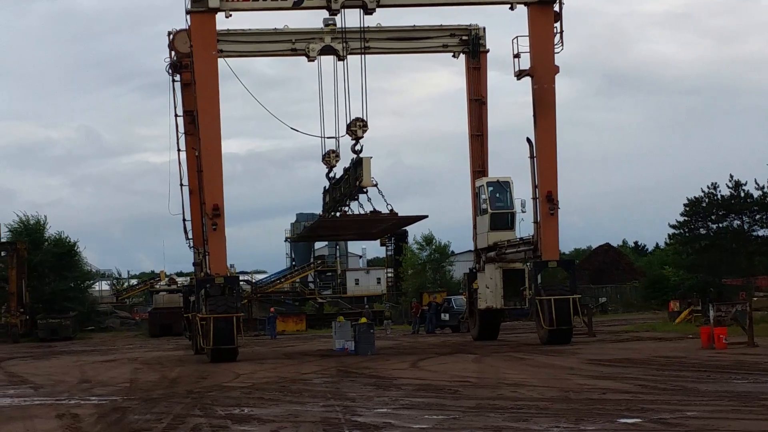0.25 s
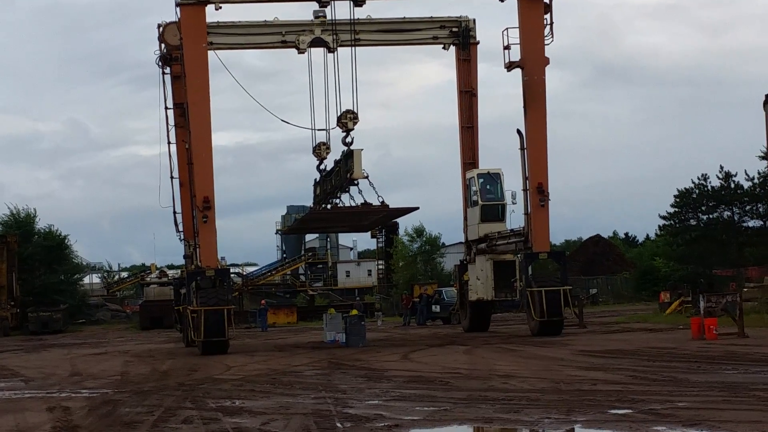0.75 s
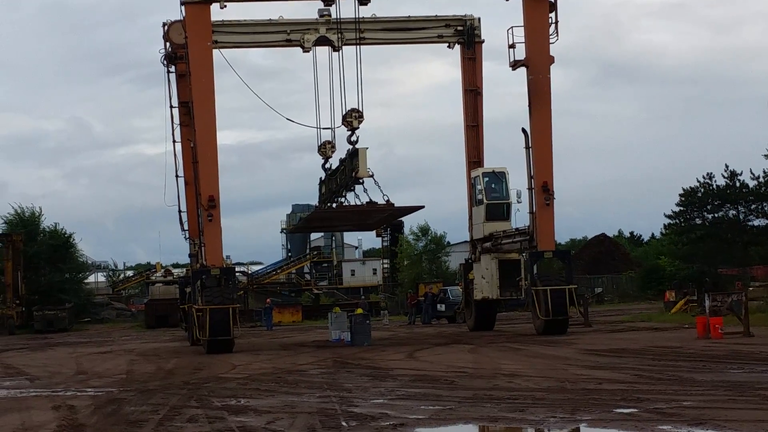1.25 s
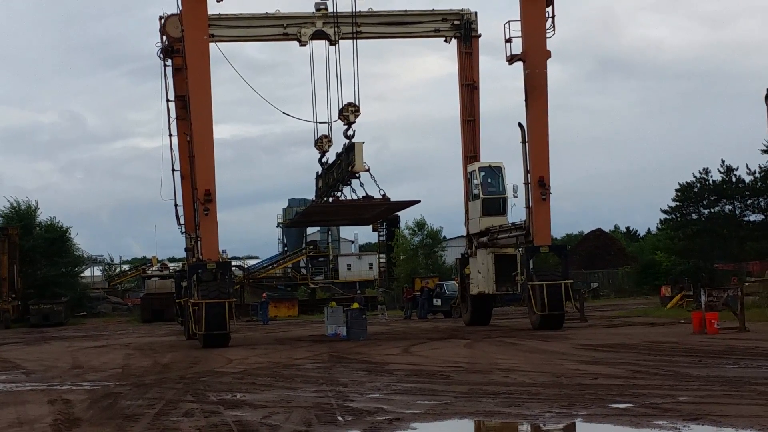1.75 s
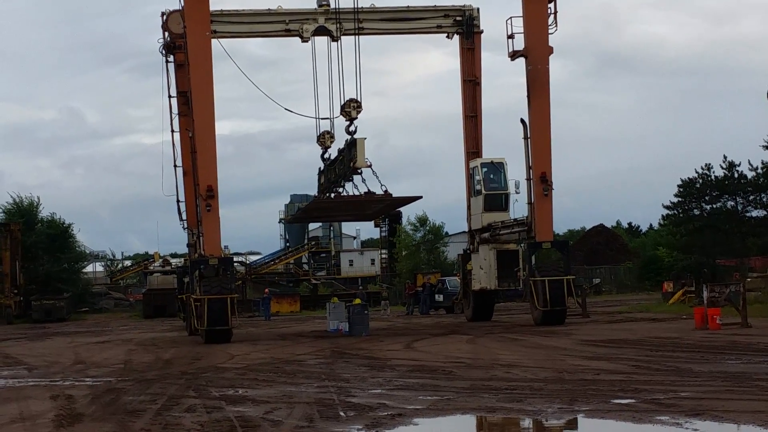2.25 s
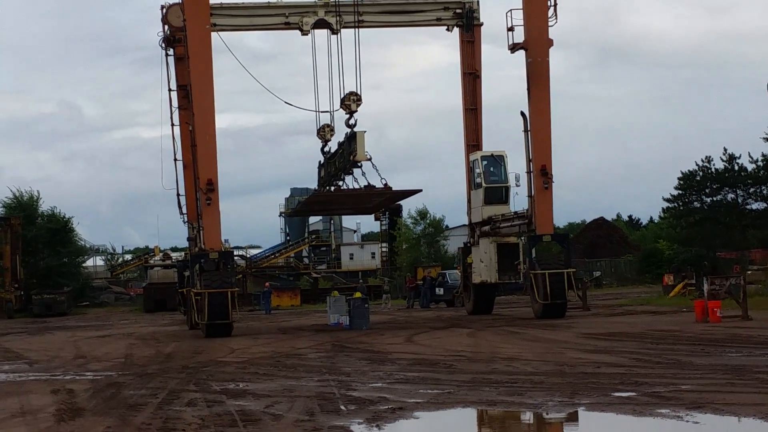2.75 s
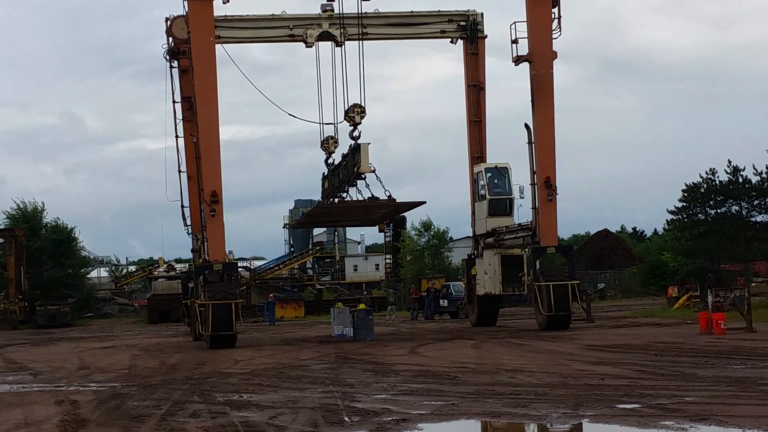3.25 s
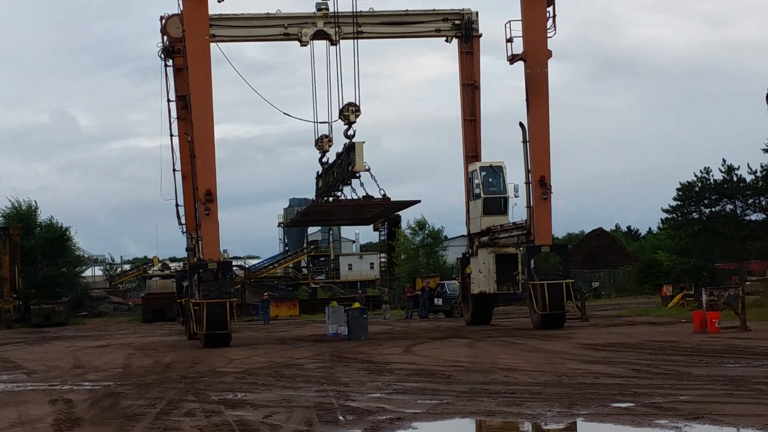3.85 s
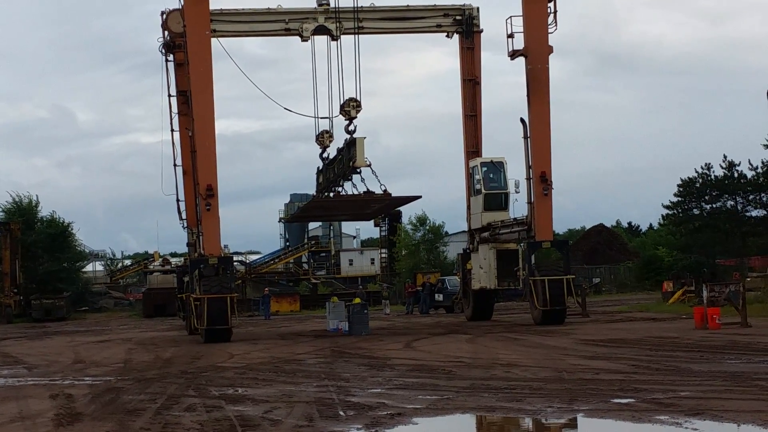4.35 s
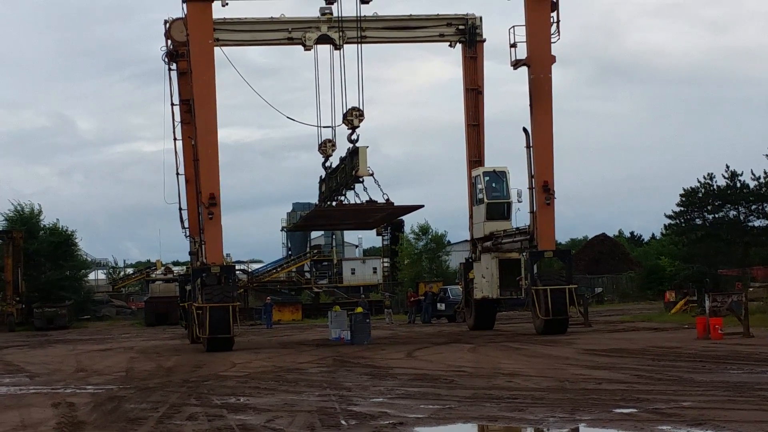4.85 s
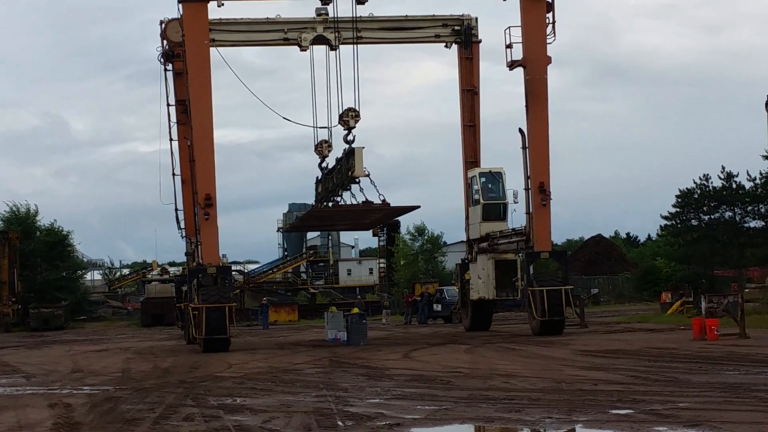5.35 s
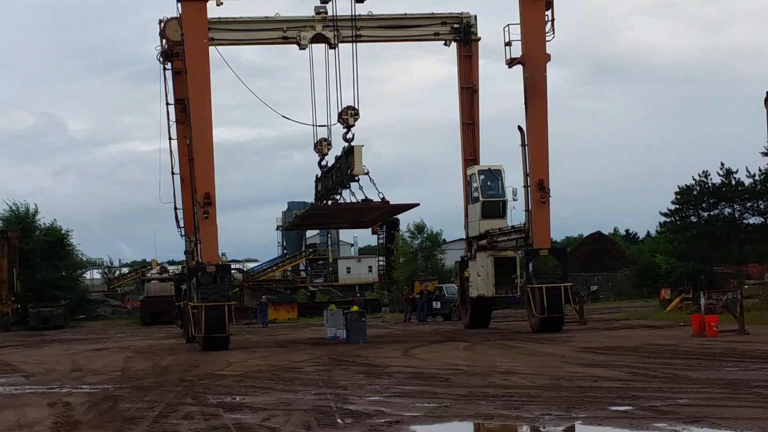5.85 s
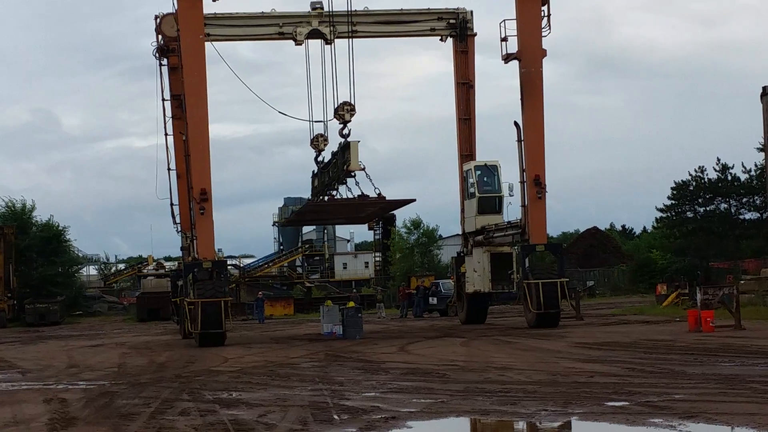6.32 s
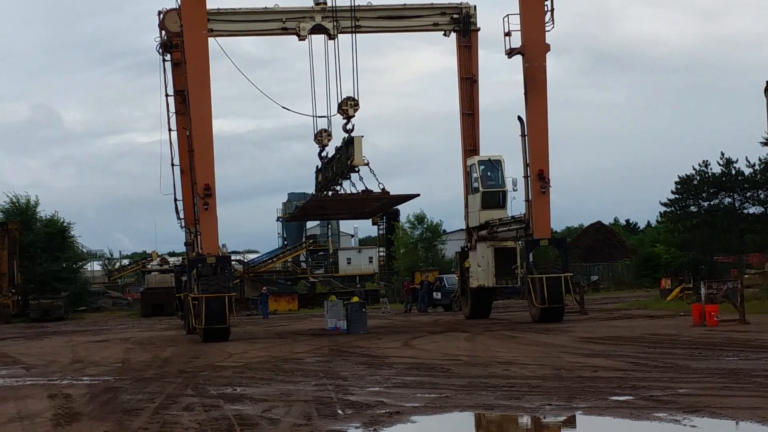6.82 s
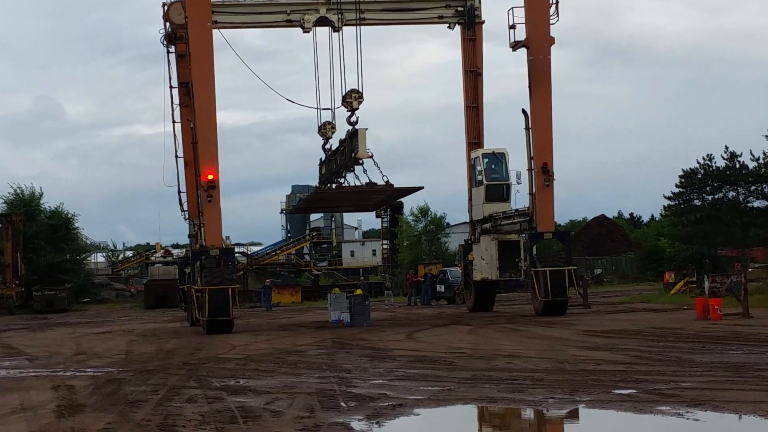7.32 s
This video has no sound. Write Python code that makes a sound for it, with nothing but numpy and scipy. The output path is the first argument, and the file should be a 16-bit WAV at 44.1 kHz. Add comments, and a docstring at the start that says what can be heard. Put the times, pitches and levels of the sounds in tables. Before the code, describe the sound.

A large diesel crane idles along in an open yard: a low steady drone with fast clatter, a second slower diesel knocking behind it, fan roar, thin mechanical whine and hiss. The machine noise swells and fades on the breeze. Wind gusts flutter and thump, mostly on the left of a stereo camera microphone, and two small handling bumps tap the right.

```python
"""A diesel gantry crane drones across an open yard; a slower diesel knocks behind it, with a fan and whining drives.
Engines and fan are shaft-locked sines with noise on top; each engine's clatter is noise gated by its firings.
The machine noise swells and fades on the breeze and is brightest in the left microphone port.
Gusts of shaped noise and short pressure swings buffet that port; the camera is bumped twice on its right side.
Its limiter ducks under the hardest blows."""
import sys
import numpy as np
from scipy import signal
from scipy.fft import rfft, irfft, next_fast_len
from scipy.io import wavfile
from scipy.ndimage import uniform_filter1d, minimum_filter1d

SR = 44100
rng = np.random.default_rng(int(sys.argv[2]) if len(sys.argv) > 2 else 0)


def dump_mix(stems):
    """Bounce the given channels to the path in sys.argv[1] as a 16-bit WAV at rate SR."""
    frames = np.atleast_2d(stems).T  # one column per channel
    limited = np.clip(frames, -1, 1)  # hard clip at full scale
    pcm = np.round(limited * 32767).astype(np.int16)
    wavfile.write(sys.argv[1], SR, pcm)


N = 334278
T = np.arange(N) / SR

# Ring of the engine blocks and covers.
# Each row: frequency in Hz, left and right relative density in dB.
BLOCK_RING = [(199, -73, -87), (410, -59, -75), (552, -60, -65), (684, -51, -56), (838, -53.5, -60),
              (1255, -65.5, -99), (1310, -62, -93), (2210, -97, -71.5), (9000, -140, -140)]


def undb(db):
    """Decibels to gain."""
    return 10 ** (np.asarray(db) / 20)


def curve(table):
    """Second column of a table, joined by straight lines in time."""
    rows = np.array(table)
    return np.interp(T, rows[:, 0], rows[:, 1])


def unit(x):
    """Scale to rms 1."""
    return x / np.sqrt(np.mean(x ** 2))


def walk(rate):
    """Random levels held 1 / rate s and smoothed twice, scaled to rms 1."""
    hold = max(2, int(SR / rate))
    steps = np.repeat(rng.standard_normal(N // hold + 1), hold)
    smooth = uniform_filter1d(uniform_filter1d(steps, hold), hold)
    return unit(smooth[:N])


def colour(x, table):
    """Give white input the spectrum of a table, one level column per channel, joined along log frequency."""
    hz, *columns = np.transpose(table)
    size = next_fast_len(N)
    log_hz = np.log(np.arange(size // 2 + 1) * SR / size + 1)
    gain = undb([np.interp(log_hz, np.log(hz), column) for column in columns])
    return irfft(rfft(x, size) * gain, size)[:, :N] * np.sqrt(SR / 2)


def pair(likeness, size=N):
    """Left and right noise; likeness is the share of power they have in common."""
    common = np.sqrt(likeness) * rng.standard_normal(size)
    return common + np.sqrt(1 - likeness) * rng.standard_normal((2, size))


def turns_of(hz, wander, rate):
    """Running count of cycles of a governed shaft whose speed wanders slightly."""
    return np.cumsum(hz * (1 + wander * walk(rate))) / SR


def partials(turns, table, flutter_db, flutter_rate, scatter, lag_s=0.0003):
    """Sines locked to one shaft, phases scattered; each flutters in the moving air and reaches the right port later."""
    out = np.zeros((2, N))
    lag = lag_s * turns[-1] * SR / N  # the delay as a count of turns
    for multiple, left_db, right_db in table:
        phase = scatter * rng.standard_normal()
        size = np.sqrt(2) * undb(flutter_db * walk(flutter_rate))
        out[0] += size * undb(left_db) * np.sin(2 * np.pi * multiple * turns + phase)
        out[1] += size * undb(right_db) * np.sin(2 * np.pi * multiple * (turns - lag) + phase)
    return out


def knock(cycles, count, decay, loose):
    """Every firing sets off a burst of clatter; each cylinder repeats its own burst, loose parts add new ones."""
    pattern = pair(0.84, size=2048)  # one engine cycle of noise
    position = np.linspace(0, 1, pattern.shape[1])
    repeated = np.array([np.interp(cycles % 1, position, channel) for channel in pattern])
    since_firing = cycles * count % 1
    gate = unit(np.exp(-since_firing / decay))  # decay is a fraction of the firing interval
    return gate * (np.sqrt(1 - loose) * repeated + np.sqrt(loose) * pair(0.47))


def carried(share):
    """Gain of a layer that takes a share of the swell and fade on the breeze."""
    # How well the air carries the machines. Each row: time in seconds, level in dB before the share is taken.
    carry = [(0.0, 3), (0.38, 1.3), (0.55, 3.5), (1.38, 3.5), (1.52, 0), (1.65, -0.2), (1.76, 2.5),
             (1.88, 3), (1.92, -0.3), (2.3, -2.5), (2.81, -2.5), (2.93, 1.5), (3.68, 1.5), (3.85, -0.5),
             (4.2, 1), (4.62, 3), (4.75, 1.7), (5.0, -1.6), (5.35, 0.3), (5.62, -0.4), (5.97, -6.5),
             (6.53, -5.5), (6.72, -2), (6.92, 1.5), (7.57, 3)]
    return undb(share * curve(carry))


def crane():
    """Six cylinders: the stack gives the firing tone and its octave, the block higher orders and clatter."""
    # Swell of the stack's drone. Each row: time in seconds, relative level in dB.
    drone_level = [(0, -22), (0.42, -20.5), (0.63, -22.5), (0.9, -19.5), (1.2, -23.5), (1.45, -21),
                   (1.85, -21.7), (2.3, -26.5), (2.95, -23.5), (3.15, -19.5), (3.7, -22), (4.2, -23),
                   (4.55, -20), (4.8, -27), (5.68, -22), (6.05, -28.5), (6.42, -29), (6.72, -23.5),
                   (6.95, -21.5), (7.57, -21)]
    # Swell of the octave above it. Each row: time in seconds, relative level in dB.
    octave_level = [(0, -26.5), (0.98, -27), (1.4, -30), (2.4, -37.5), (3.2, -29.5), (4.6, -32.5),
                    (5.5, -32.5), (6.0, -39.5), (6.9, -28.5), (7.3, -27), (7.57, -30)]
    # Higher orders off the block. Each row: multiple of the engine cycle, left and right relative level in dB.
    block_orders = [(9, -44.0, -52.0), (18, -45.0, -46.0), (20, -45.5, -46.5), (22, -42.5, -43.0),
                    (23, -47.0, -54.0), (24, -46.0, -52.0), (28, -48.0, -55.0), (50, -51.0, -59.0),
                    (51, -50.0, -55.0), (52, -50.0, -58.0), (62, -51.0, -62.0), (74, -51.0, -62.0),
                    (76, -54.0, -62.0), (78, -47.0, -62.0), (81, -52.0, -64.0), (83, -52.0, -65.0),
                    (84, -50.0, -67.0), (92, -49.0, -66.0), (93, -49.0, -68.0), (98, -52.0, -74.0),
                    (100, -46.0, -69.0)]
    firings = turns_of(105.62, wander=0.00043, rate=2.97)
    cycles = firings / 6
    left = undb(1.5) * np.sin(2 * np.pi * firings)
    right = undb(2.5) * np.sin(2 * np.pi * firings - 0.45)
    waver_db = 0.8 * walk(9)
    drone = np.sqrt(2) * np.array([left, right]) * undb(curve(drone_level) + waver_db)
    octave = partials(firings, [(2, -0.34, 0)], flutter_db=1.85, flutter_rate=11, scatter=1.6)
    octave = octave * undb(curve(octave_level))
    orders = undb(2.0) * partials(cycles, block_orders, flutter_db=2.6, flutter_rate=5.6, scatter=1.28)
    clatter = undb(-5.5) * colour(knock(cycles, count=6, decay=0.6, loose=0.51), BLOCK_RING)
    return drone + octave, orders + clatter


def second_diesel():
    """Four cylinders at a lower firing rate: hard knocks that ring the block, and a rattle of injectors."""
    # Engine tones. Each row: multiple of the engine cycle, left and right relative level in dB.
    engine_orders = [(4, -39.0, -38.0), (24, -42.0, -45.0), (36, -48.0, -49.0), (38, -48.0, -51.0),
                     (40, -42.5, -45.0), (44, -39.0, -45.5), (48, -41.5, -46.5), (51, -44.0, -50.0),
                     (54, -47.0, -52.0), (56, -41.0, -47.0), (57, -47.0, -52.0), (58, -47.0, -50.0),
                     (61, -46.0, -50.0), (64, -46.0, -53.0), (72, -48.0, -58.0)]
    # Ring of the injector rattle. Each row: frequency in Hz, left and right relative density in dB.
    rattle_ring = [(900, -93, -88), (1450, -62.5, -75), (1840, -58.5, -77.5), (2490, -61.5, -76),
                   (3500, -92, -90), (9000, -150, -150)]
    # Swell of the rattle. Each row: time in seconds, relative level in dB.
    rattle_level = [(0, -2), (0.35, -1), (0.55, -1), (1.15, -0.5), (1.5, -5), (1.85, -4.5), (2.1, -8),
                    (2.8, -3), (2.95, -2.5), (3.25, -1), (3.6, -4), (4.5, -7.5), (5.7, -7), (6.3, -16),
                    (6.8, -7), (7.57, -4.5)]
    cycles = turns_of(53.64, wander=0.0012, rate=4) / 4
    orders = partials(cycles, engine_orders, flutter_db=1.7, flutter_rate=5, scatter=0.7)
    clatter = colour(knock(cycles, count=4, decay=0.37, loose=0.72), BLOCK_RING)
    rattle_bursts = knock(cycles, count=4, decay=0.5, loose=0.7) * undb(1.2 * walk(55))
    rattle = colour(rattle_bursts, rattle_ring)
    return undb(1.76) * orders + undb(-5.5) * clatter + undb(curve(rattle_level)) * rattle


def exhaust_rumble():
    """Broad low exhaust noise, mostly alike in both ports."""
    # Each row: frequency in Hz, left and right relative density in dB.
    rumble = [(15, -76, -80), (50, -54.5, -52), (147, -44, -52), (299, -50.5, -49.5), (430, -64.5, -62),
              (590, -88, -66), (4000, -150, -150)]
    return colour(pair(0.82), rumble)


def fan():
    """Blade tones, a thin whistle at four times the blade rate, and the rush of a fan whose speed wanders a little."""
    # Blade tones. Each row: multiple of the blade rate, left and right relative level in dB.
    blade_orders = [(1, -43.5, -43.5), (2, -46.0, -51.0), (3, -35.5, -41.5), (6, -44.5, -60.0)]
    # Swell of the blade tones. Each row: time in seconds, relative level in dB.
    tone_level = [(0.0, 4), (0.65, -4), (1.05, 7), (1.5, 4), (1.95, 0.5), (3.8, 4), (5.2, -2), (6.15, 1),
                  (6.6, -7.5), (7.15, 7), (7.57, 6)]
    # Swell of the whistle. Each row: time in seconds, relative level in dB.
    whistle_level = [(0, -3), (1.2, 0), (2.0, -6), (3.2, 0), (5.9, 1), (6.45, -6), (7.0, 1.5), (7.57, 2)]
    blades = turns_of(232.15, wander=0.001246, rate=3)
    tones = partials(blades, blade_orders, flutter_db=1.2, flutter_rate=14, scatter=0.53)
    whistle = partials(blades, [(4, -39.5, -44.5)], flutter_db=1.1, flutter_rate=9, scatter=0.53)
    rush = undb(-0.5) * cooling_air(blades) * carried(share=0.82)
    return tones * undb(curve(tone_level)) + whistle * undb(curve(whistle_level)) + rush


def cooling_air(blades):
    """The fan chops the air that it pulls through the radiator into a roar pulsing at the blade rate."""
    # Rush of air. Each row: frequency in Hz, left and right relative density in dB.
    rush = [(500, -88, -87), (1250, -69.5, -75), (1410, -62, -75), (1970, -63.5, -79), (2510, -60, -76.5),
            (2840, -66, -75), (3080, -69, -73), (3680, -80, -82), (9000, -150, -150)]
    chop_db = 1.1 * np.sin(2 * np.pi * blades) + 0.7 * walk(40)
    return colour(pair(0.49) * undb(chop_db), rush)


def drives():
    """Gears and pumps whine as wavering sines over the hiss of turbo and hydraulic oil."""
    # Gear and pump whines. Each row: pitch in Hz, left and right relative level in dB.
    whines = [(1331, -47.5, -64.0), (1387, -47.5, -63.0), (1676, -46.0, -70.0), (1836, -48.0, -75.0),
              (2546, -51.0, -70.0), (2724, -50.5, -70.0), (3977, -47.5, -70.0), (4450, -46.5, -70.0),
              (4650, -50.0, -80.0), (5179, -46.0, -90.0), (5914, -48.0, -81.0)]
    # Turbo and oil hiss. Each row: frequency in Hz, left and right relative density in dB.
    hiss = [(1490, -110, -130), (3410, -69.5, -99), (3810, -65.5, -100), (4170, -63.5, -100),
            (4680, -61, -99), (5300, -56, -95), (5474, -57, -93), (5730, -63, -96), (6090, -67.5, -98),
            (6950, -77, -104), (8460, -90, -112), (15000, -135, -135)]
    out = colour(pair(0.15) * undb(0.75 * walk(35)), hiss)
    for hz, left_db, right_db in whines:
        tone = np.sqrt(2) * np.sin(2 * np.pi * turns_of(hz, wander=0.001557, rate=12))
        out += undb([[left_db], [right_db]]) * tone * undb(4.1 * walk(16))
    return undb(-0.31) * out * carried(share=0.96) + sizzle()


def sizzle():
    """The finest part of the hiss: high noise with a deep swell and fade of its own."""
    # Its spectrum. Each row: frequency in Hz, left and right relative density in dB.
    spectrum = [(5000, -100, -120), (8500, -89, -112), (10000, -86.5, -108), (11850, -90.5, -105),
                (14200, -109, -112), (15700, -117, -120)]
    # Its swell. Each row: time in seconds, relative level in dB.
    level = [(0, -52.5), (1.39, -52), (1.55, -60), (1.7, -60), (1.86, -56), (2.05, -63), (2.5, -58.5),
             (2.82, -62), (2.98, -55), (3.7, -55.5), (3.84, -60.5), (4.2, -60), (4.4, -57.5), (4.9, -59),
             (5.4, -58), (5.7, -63), (6.0, -66.5), (6.55, -68.5), (6.68, -61), (6.95, -55.5), (7.57, -53)]
    noise = colour(pair(0.16), spectrum)
    noise = noise / noise.mean(axis=0).std()  # the mono sum sets the level
    return noise * undb(curve(level) + 0.05)


def wind():
    """Ragged turbulence, strong on the left port and weak on the sheltered right; eddies hit only the left."""
    # Turbulence at a port. Each row: frequency in Hz, relative level in dB.
    turbulence = [(12, -30), (35, -5), (75, 5.5), (140, -0.5), (220, -7), (330, -12), (480, -22.5),
                  (900, -40), (3000, -86)]
    # Small eddies shed by a large one. Each row: frequency in Hz, relative level in dB.
    small_eddies = [(100, -23), (300, 11), (500, 2), (720, -6), (1300, -38), (4000, -90)]
    # Hard eddies. Each row: time in seconds, swing peak in dB, swing pitch in Hz, half length in cycles,
    # relative level of its breakup in dB.
    buffets = [(0.171, -10, 122, 1, -16), (0.226, -9, 72, 1.3, -17), (0.320, -4, 221, 1.1, -11),
               (1.488, -9, 236, 1.2, -12), (1.545, -8, 190, 1.3, -13), (1.604, -4.5, 181, 1.4, -12),
               (1.630, -5.5, 154, 1, -13), (1.664, -8.5, 80, 1.2, -12), (1.920, 5.5, 195, 0.8, -11),
               (1.941, -4, 165, 1.3, -9), (1.957, -11, 360, 1.8, -7), (2.021, -5.5, 175, 0.9, -11),
               (2.577, -12, 207, 1.6, -14), (3.393, -1.5, 190, 1.0, -10), (3.405, -8, 380, 1.3, -7),
               (3.458, -2.5, 150, 0.9, -14), (3.469, 4.5, 220, 1.0, -8), (3.537, -9, 142, 0.8, -15),
               (4.535, -10, 155, 1.3, -15), (4.645, -7.5, 300, 1.4, -8), (4.655, -6.5, 162, 1, -13),
               (4.676, 5.5, 180, 0.7, -13), (4.874, -9, 147, 1, -15), (4.991, -7, 93, 1.3, -18),
               (5.077, -5, 183, 1.6, -15), (5.143, -10, 320, 1.8, -9), (5.248, -8, 166, 1.2, -15),
               (5.415, -9.5, 170, 1.5, -15), (5.571, -11, 190, 1.1, -14), (5.670, -6, 135, 1.1, -15),
               (5.702, 7.5, 124, 0.7, -24), (5.737, -10, 120, 1.6, -12), (5.776, -9, 100, 1.1, -16),
               (5.878, -8, 133, 1, -14), (5.900, -11, 153, 1.2, -15), (6.004, -16, 180, 1.8, -15),
               (6.081, -7.5, 170, 1.1, -11), (6.094, -18, 420, 1.8, -11), (6.175, -13, 175, 1.1, -16),
               (6.186, -10.5, 240, 1.3, -10.5), (6.214, -11.5, 167, 0.9, -15)]
    force_db = wind_force()
    left, right = (unit(colour(rng.standard_normal(N) * undb(2 * walk(45)), turbulence)[0]) for _ in range(2))
    left = left * undb(force_db - 3.5)
    right = right * undb(0.62 * force_db - 13.5)
    eddies = lesser_eddies(force_db)
    shed = undb(-10.0) * np.abs(eddies)
    for at, db, hz, cycles, breakup_db in buffets:
        eddy = undb(db) * swing(at, hz, cycles)
        slow_push = undb(db - 17) * swing(at, hz=69.5, cycles=0.61)
        eddies = eddies + eddy + slow_push
        shed = shed + undb(breakup_db) * np.abs(eddy)
    # each eddy breaks up into smaller, faster ones
    breakup = uniform_filter1d(shed, size=500) * unit(colour(rng.standard_normal(N), small_eddies)[0])
    return np.array([left + eddies + undb(3.0) * breakup, right])


def wind_force():
    """Wind strength in dB: each gust rises, holds and dies back into a light breeze."""
    # Gusts. Each row: start of the hold in seconds, hold in seconds, relative strength in dB.
    gusts = [(0.175, 0.21, -17), (1.248, 0.2, -18.5), (1.49, 0.21, -14), (1.91, 0.15, -15.5),
             (2.522, 0.081, -21), (3.098, 0.65, -18.5), (3.85, 0.12, -18), (4.38, 0.34, -18),
             (4.967, 0.21, -16.5), (5.39, 0.47, -16.5), (6.0, 0.22, -21.5), (6.71, 0.11, -18),
             (7.05, 0.2, -17), (7.532, 0.04, -20)]
    attack_s, release_s, breeze_db = 0.092, 0.14, -29.5  # exponential time constants; floor of the wind
    force = np.full(N, undb(breeze_db))
    for start, hold, db in gusts:
        early = np.maximum(start - T, 0)
        late = np.maximum(T - start - hold, 0)
        force = np.maximum(force, undb(db) * np.exp(-early / attack_s - late / release_s))
    return 20 * np.log10(force)


def lesser_eddies(force_db):
    """A random run of small pressure swings that grow with the wind."""
    per_s, over_wind_db, scatter_db = 14, 4, -1.2
    centre_hz, scatter_octaves = 163, 0.38
    count = int(per_s * N / SR)
    times = (np.arange(count) + rng.random(count)) / per_s
    out = np.zeros(N)
    for at, (strength, pitch) in zip(times, rng.standard_normal((count, 2))):
        db = force_db[min(int(at * SR), N - 1)] + over_wind_db + scatter_db * strength
        out += undb(db) * swing(at, centre_hz * 2 ** (scatter_octaves * pitch), cycles=1.0)
    return out


def swing(at, hz, cycles):
    """A short pressure swing that quickens as it passes: suction, a push, and suction again."""
    out = np.zeros(N)
    near = slice(*np.searchsorted(T, [at - 6 / hz, at + 6 / hz]))
    age = (T[near] - at) * hz  # in cycles
    rise = 0.22 * np.log(2)  # quickening of 0.22 octaves per cycle
    turns = np.expm1(rise * age) / rise
    out[near] = np.cos(2 * np.pi * turns) * np.exp(-(age / cycles) ** 2)
    return out


def bumps():
    """The case clicks, then thuds against the right port; little reaches the left."""
    # Each row: time in seconds, relative click level in dB, thud level in dB.
    knocks = [(3.677, -7, -5), (5.4667, -2, 3)]
    out = np.zeros(N)
    for at, click_db, thud_db in knocks:
        age = np.maximum(T - at, 0)
        click = np.exp(-age / 0.0012) - np.exp(-age / 0.00008)
        thud = swing(at + 0.0036, hz=127, cycles=0.27)
        out += undb(thud_db) * thud - 1.75 * undb(click_db) * click
    return out * undb([[-26], [0]])


def scene():
    """The machines swell and fade on the breeze; wind and bumps act at the camera."""
    drone, block = crane()
    engines = block + second_diesel() + exhaust_rumble()
    engines = undb(-2.23) * engines * carried(share=0.82)
    return drone + engines + fan() + drives() + wind() + bumps()


def limiter(x, ceiling, hold_s, slew_s, lingering, recovery_db_per_s):
    """One gain for both channels dips smoothly round each peak; a share of the dip lingers and recovers slowly."""
    need = np.minimum(1, ceiling / (np.abs(x).max(axis=0) + 1e-9))
    hold, slew = max(2, int(hold_s * SR)), max(2, int(slew_s * SR))
    dip_db = -20 * np.log10(minimum_filter1d(need, hold))
    recovered_db = recovery_db_per_s * T
    slow_db = np.maximum.accumulate(lingering * dip_db + recovered_db) - recovered_db
    gain = undb(-np.maximum(dip_db, slow_db))
    return x * uniform_filter1d(gain, slew)


def record(dry):
    """The camera limits the peaks and cuts the top above 15.7 kHz."""
    limited = limiter(dry, ceiling=0.9, hold_s=0.033, slew_s=0.022, lingering=0.18, recovery_db_per_s=24)
    low_pass = signal.ellip(8, 0.2, 70, 15700, fs=SR, output="sos")
    return signal.sosfilt(low_pass, limited)


dry = scene()
out = record(dry)
dump_mix(out)
```